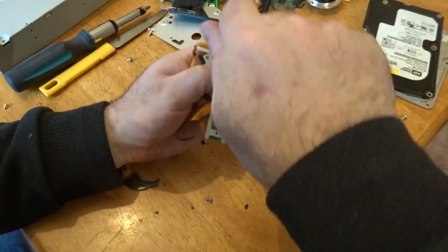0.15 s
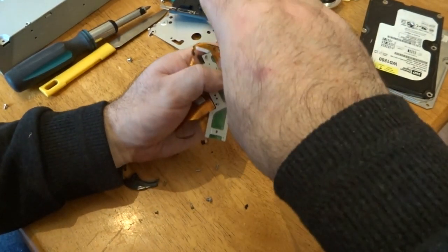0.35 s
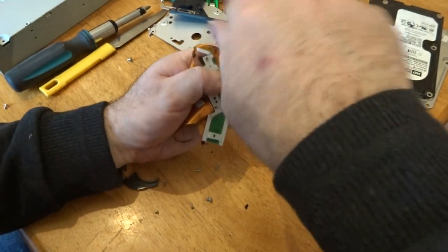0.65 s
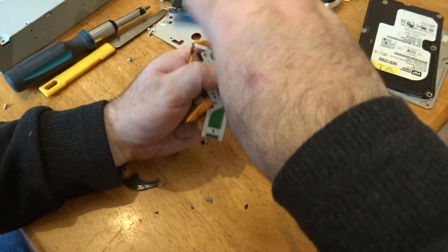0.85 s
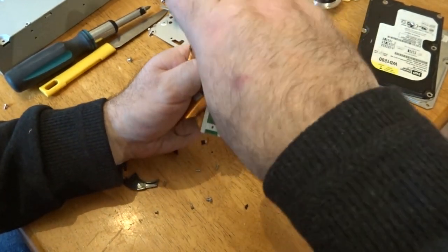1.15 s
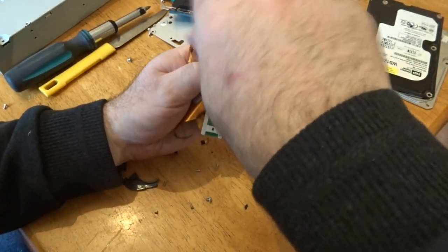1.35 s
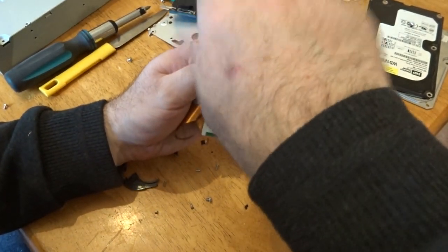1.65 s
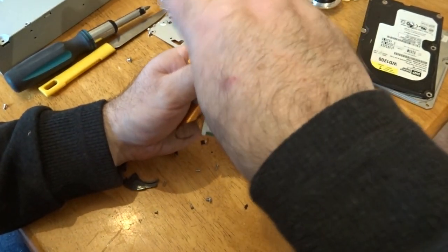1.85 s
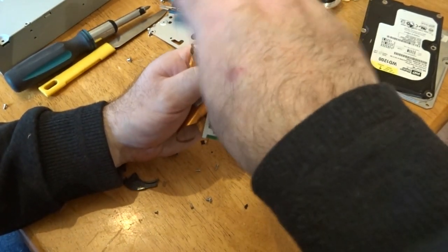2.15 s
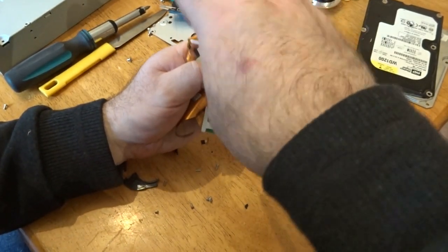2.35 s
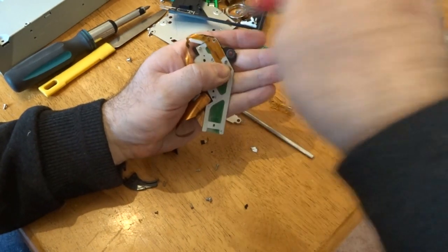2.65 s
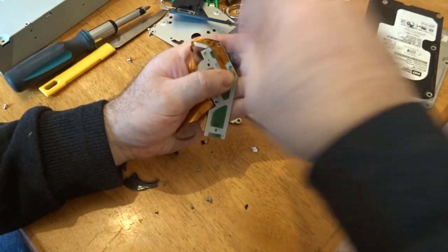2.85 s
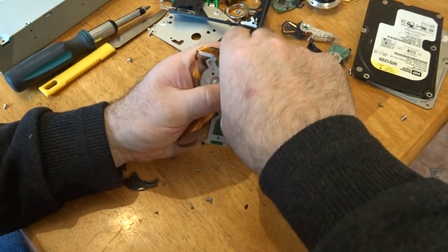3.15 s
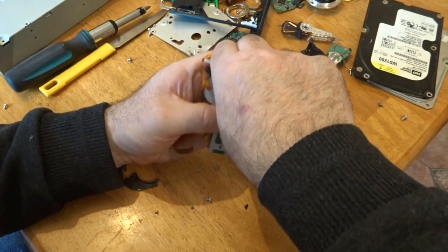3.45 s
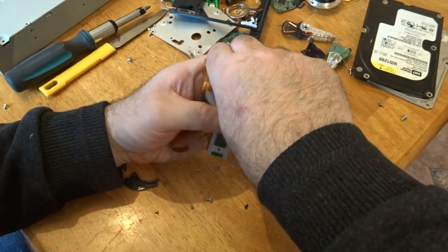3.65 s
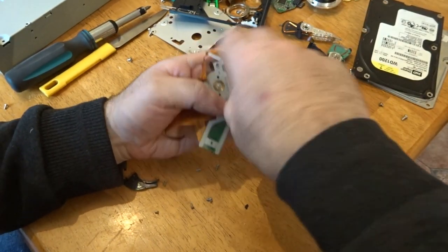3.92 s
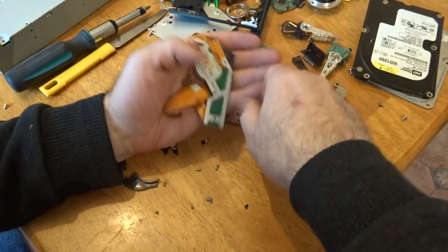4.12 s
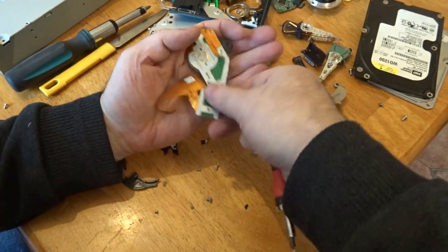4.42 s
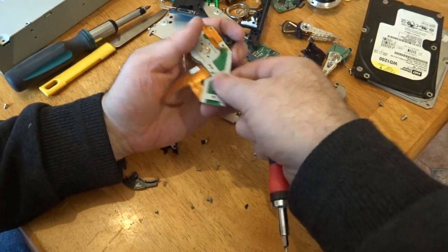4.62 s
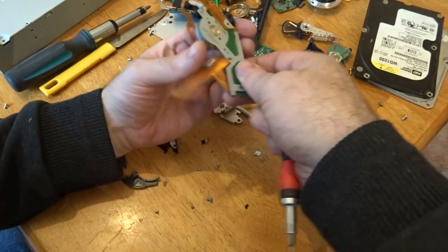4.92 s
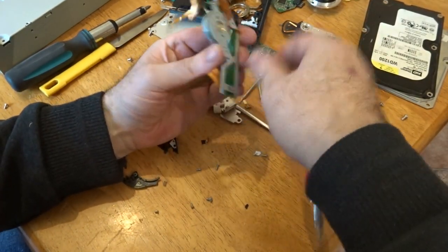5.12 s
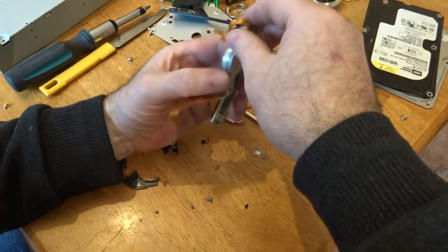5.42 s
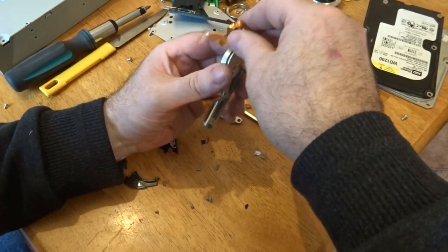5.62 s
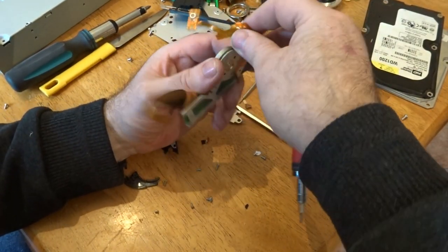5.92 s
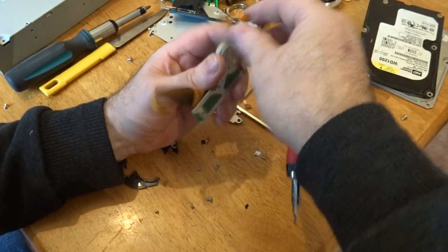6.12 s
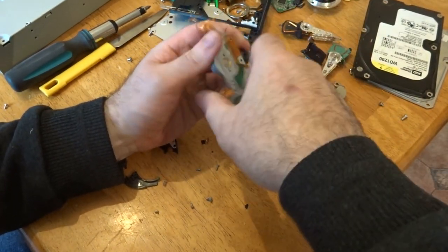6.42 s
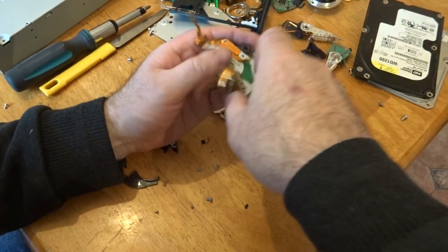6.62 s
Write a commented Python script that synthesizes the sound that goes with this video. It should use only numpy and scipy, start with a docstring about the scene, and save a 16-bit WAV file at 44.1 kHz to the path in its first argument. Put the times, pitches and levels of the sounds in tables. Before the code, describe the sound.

Tiny brittle clicks and snaps, mostly a millisecond or two long, come in uneven clusters as a small part is worked by hand. Soft gritty finger rubbing lies between them. Early clicks are mid-high and plasticky; later ones are thinner and more metallic. Two dull wooden bumps, a barely audible squeak or two and low, airy room noise sit beneath, heard close up in a small room.

```python
"""Prying small parts apart

Hands pry small plastic and metal parts apart over a wooden bench in a small room, heard close up in stereo.
Each snap is a burst of a millisecond or two that rings the part; fingers rustle as tiny slips over hiss.
Decaying low tones make two bench bumps, gliding tones squeak faintly, and echoes with a dense tail make the room.
Coloured noise gives the quiet wide air, the shaking bench and a hollow swell; a thin wavering tone whines."""
import sys
import numpy as np
from scipy import signal
from scipy.fft import rfft, irfft
from scipy.io import wavfile
from scipy.ndimage import uniform_filter1d

SR = 44100
rng = np.random.default_rng(int(sys.argv[2]) if len(sys.argv) > 2 else 0)


def store_wav(level_fs):
    """Save 16-bit WAV to argv[1]."""
    pcm = np.round(np.clip(np.atleast_2d(level_fs), -1, 1) * 32767)
    wavfile.write(sys.argv[1], SR, pcm.T.astype(np.int16))


N = 298557  # length in samples

# parts snapping: [start t/s, energy level/dB, ring f/Hz, brightness/dB, weight/dB, thud/dB]
SNAP_EVENTS = [(0.0137, -22.0, 3950, -16, 6, 11), (0.1059, -18.5, 4200, -13, 5, -8),
               (0.1114, -17, 4200, -11, 0, -8), (0.334, -13.4, 3940, -22, -6, -8),
               (0.3622, -3, 3950, -14, -5.5, -6.5), (0.4854, -25.5, 3940, -6, -18, -12),
               (0.543, -16.5, 4130, -19, -4, -2), (0.6658, -12.5, 4100, -17, -6, -4),
               (0.7071, -22, 4500, -22, 4, -9), (0.858, -13.5, 8000, -5, 1.5, -2),
               (0.9662, -19, 3970, -8, 0, -12), (1.045, -19.1, 9050, -7, -21, -15),
               (1.0865, -22.5, 4200, -26, 2, 3), (1.125, -19.5, 3910, -5, -2, -13),
               (1.2157, -5.5, 9140, 3.5, -16, -9), (1.4081, -22.5, 8950, -6, -15, -11),
               (1.441, -21.5, 8850, -5, -13, -20), (1.6872, -11.5, 4520, -8, -12, -17),
               (1.7208, -15, 10700, -3, -9, -19), (1.9756, -22, 13500, 26, -11, -3),
               (2.024, -18.5, 12400, -8, -6, -7), (2.1335, -17.5, 7060, -13, -4, -9),
               (2.139, -6, 4000, -16, 0, -14.5), (2.1535, -14, 4160, -8, -7, -14),
               (2.2841, -7, 4020, -9, -6, -15), (2.314, -18.5, 3920, -14, 4, -9),
               (2.3458, -14, 5970, -17, -1, -17), (2.4053, -9.0, 3240, -15.5, -0.5, -8),
               (2.519, -10.5, 3880, -16, -9, -22), (2.5381, -5.5, 3720, -17, 0, -23),
               (2.5556, -12, 3800, -11, 4, -7), (2.602, -21, 4100, 1, 2, -11),
               (2.6478, -13.6, 5320, -14, -8, -12), (2.6693, -18, 5500, -5, 1, -9),
               (2.7109, -4, 6500, -4, 2.5, -11.5), (2.7706, -19.5, 4500, -15, -1, -13),
               (2.8604, 5.5, 4130, -6.5, -1.5, -21), (2.8872, -3, 7050, 7, -4, -18),
               (2.9475, -19, 2770, -12, 7, -8), (3.125, -28.5, 5070, -21, 4, 1),
               (3.4, -19, 3180, -6, -6, -18), (3.5512, -20, 7300, 0, -13, -2),
               (3.6931, -15, 7000, -4, -2, -9), (3.7344, -28, 2780, -14, 17, 6),
               (3.751, -20.5, 2800, 1, -1, -20), (4.2021, -10, 6400, 0, -1, -6),
               (4.327, -19, 6150, 0, 1, 1), (4.624, -26.2, 6450, -3, -8, -12),
               (4.678, -20.5, 6470, -1, -9, -10), (4.7397, -17.5, 5500, 1, -15, -21),
               (4.8224, -9, 10200, -1, -11, -4), (4.8367, -15, 4280, -13, -6, -10),
               (4.868, -8, 7160, 3, -18, -26), (4.8762, -15, 9300, 0, -19, 3),
               (4.887, -21, 3960, -2, -4, -2), (4.92, -19, 3930, -21, 3, 7),
               (5.0968, -3.9, 12100, -9, -16, -6), (5.4417, -24, 9600, 4, -8, -3),
               (5.501, 0.8, 6960, 9, -6.5, -17), (5.5248, -4.0, 6940, 1, -11, -11),
               (5.697, -3.5, 11700, 25, -29, -23), (5.7437, -20.5, 14800, 17, -21, -15),
               (5.881, -16.7, 6360, 12, -13, -8), (5.981, 4.5, 11800, 15, -20, -13),
               (6.089, -16.5, 6400, -3, -12, -13), (6.115, -10.0, 6100, 5, -2, -11),
               (6.1516, -12.6, 8500, 12, -3, -11), (6.163, -19, 11750, 17, -15, 3),
               (6.2854, -20, 3920, -20, 1, 0), (6.379, -15, 2680, -11, 5, 4),
               (6.3898, -5.5, 4700, -9, -4, -9), (6.4033, -2.5, 2530, -20, 11.5, -3),
               (6.4284, -14, 4070, 5, -9, -7), (6.5816, -18, 2700, -3, 7, -5),
               (6.5947, -20.5, 8870, 0, -1, -11), (6.6828, -14, 9100, 18, -8, -15),
               (6.7275, 1.6, 10500, 10, 2, -24)]
# colour of a snap: [f/Hz, level/dB, then dB per dB of brightness, of weight, of thud]
SNAP_TINT = [(300, -15, -0.5, 0.17, 0.8), (1540, -3.5, 0, 0, 1), (2770, 0, 0, 0.85, 0),
             (4000, -1, -0.37, 0.013, 0), (7300, 2.5, 0, 0.0091, 0.086), (11900, 0.5, .5, 0.02, 0.072),
             (17000, -5, .5, 0, 0.15)]
# where the held part rings: [f/Hz, width f/Hz, lift level/dB]
PART_RINGS = [(4000, 900, 4), (6550, 500, 3), (9200, 2100, 2), (12000, 1200, 2)]
# fingers rubbing and flexing the parts: [start t/s, end t/s, level/dB, brightness/dB, weight/dB]
RUB_STROKES = [(0, 0.103, -60.5, -22, 7), (0.252, 0.33, -64, -12, -0.5), (0.364, 0.526, -56.5, -6, -4),
               (0.83, 1.23, -62.5, 2, -5), (1.627, 1.792, -61, 24, -6), (1.96, 2.124, -60, -12, 1),
               (2.104, 2.17, -56, 3, 0), (2.283, 2.444, -51.5, 6, -10), (2.506, 2.622, -54.5, 4, 3),
               (2.755, 2.88, -50, 0, -6), (3.299, 3.435, -62, -3, -19), (3.536, 3.586, -61, -14, -8),
               (3.675, 3.776, -55, 7, 1), (3.81, 3.93, -62.5, 1, -5), (4.192, 4.309, -50, -1.5, 11),
               (4.293, 4.533, -52, -2, 6), (4.538, 4.748, -53.5, 3, 2), (4.787, 4.865, -43, -4, 11),
               (4.855, 4.948, -49.5, -5, 13.5), (5.067, 5.09, -52, 7, 19.5), (5.376, 5.478, -65.5, 8, 2),
               (5.982, 6.2, -52.5, -1, 5.5), (6.324, 6.419, -54.5, -2, 5.5), (6.41, 6.532, -53, -2, 5),
               (6.546, 6.663, -58.5, 2, -11), (6.687, 6.702, -64, -12, -1)]
# colour of a rub: [f/Hz, level/dB, then dB per dB of brightness, of weight]
RUB_TINT = [(1180, -8.5, 1, 0.62), (2000, -2.5, 0.5, 1), (2870, -5, -.3, 0.24), (4000, -0.5, -.5, 0),
            (7000, 2.5, 1, 0.12), (12100, 0, 1, 0.043), (16900, -4, -0.5, 0)]
# bumps on the bench: [start t/s, level/dB, extra level of the tones above 200 Hz/dB]
BENCH_BUMPS = [(2.188, -33.5, -2.5), (6.596, -25, 7.5)]
# tones of the bench: [f/Hz, level/dB, time to fall by 60 dB t/s]
BENCH_MODES = [(44.7, -8, 0.54), (94.2, 0, 0.22), (120, -4.5, 0.3), (331.5, 4.5, 0.072), (398, -17, 0.33),
               (530, -5, 0.037)]
# the bench and microphone mount shaking faintly: [t/s, level/dB]
SHAKE_LEVEL = [(0, -72.5), (.35, -69), (.42, -58.5), (.65, -69), (.95, -69.5), (1.1, -67), (1.4, -76),
               (2.17, -67), (2.22, -53), (2.5, -58.5), (2.75, -72), (3.2, -72), (4.8, -79.5), (6.59, -79),
               (6.65, -51), (6.77, -68)]
# colour of the shaking: [f/Hz, relative level/dB]
SHAKE_SPECTRUM = [(15, -42), (45, -13.5), (120, -7.5), (220, -17), (400, -35)]
# swells of a hollow band of noise, about one a second: [loudest t/s, level/dB, fade t/s]
SWELL_EVENTS = [(.53, -56, 0.17), (1.5, -67, 0.38), (2.569, -59.5, 0.18), (3.35, -65.5, 0.6),
                (4.29, -59.5, 0.21), (5.15, -58, 0.35), (6.08, -59, 0.38)]
# the hollow resonance of the swells: [f/Hz, width f/Hz]
SWELL_RESONANCE = (358, 122)
# colour of the room air: [f/Hz, relative level/dB]
AIR_SPECTRUM = [(18, -21), (30, -16), (134, 3), (251, 4), (301, 3.5), (537, 2.5), (931, 2), (1240, -9),
                (1420, 1.5), (1940, 5), (2590, -6.5), (7010, -10), (12200, -11.5), (14600, -12.5),
                (15800, -20)]
# how alike left and right air are: [f/Hz, likeness from -1 to 1]
AIR_LIKENESS = [(60, 0.057), (130, 0.48), (290, -0.49), (640, -0.53), (1410, 0.14), (3100, -0.07),
                (6820, 0.63), (15000, 1)]
# how much louder the air is on the left: [f/Hz, level/dB]
AIR_LEFT_LIFT = [(60, 2), (180, -1.5), (550, 3), (1650, -7), (4970, 1.5), (15000, -1)]
# how fast the room's tail dies: [f/Hz, time to fall by 60 dB t/s]
ROOM_DECAY = [(1000, 1), (2600, 0.44), (7000, 0.38), (15500, 0.23)]
# early echoes from bench and walls: [delay t/s, level/dB]
EARLY_ECHOES = [(.0035, -13.5), (.0085, -12), (0.0116, -19.5), (0.016, -18), (.026, -21)]
# faint short tones: [start t/s, length t/s, start f/Hz, end f/Hz, level/dB]
SQUEAK_GLIDES = [(2.036, 0.07, 902, 954, -61), (5.218, 0.06, 675, 636, -59)]
# the microphone's treble fall: [f/Hz, level/dB]
MIC_TREBLE = [(15750, 0), (16000, -30), (16900, -38)]

AIR_DB, WHINE_DB, WHINE_HZ = -55.5, -74, 15625
SWELL_RISE_S, SWELL_REST_DB = 0.1, -74
SNAP_PAN_DB = 0.3  # left over right
EDGE_HZ = 17050  # top of the microphone's band


def gain_of(db):
    """Turns dB into a multiplying factor."""
    return 10 ** (np.asarray(db) / 20)


def left_right(pan_db):
    """Two gains that make left louder than right by pan_db."""
    return gain_of([[pan_db / 2], [-pan_db / 2]])


def evened(x):
    """Scales a sound so that its average strength (rms) is 1."""
    return x / np.sqrt(np.mean(x ** 2) + 1e-20)


def read(points, hz):
    """Reads a table between its points, with pitch spaced as the ear hears it (log frequency)."""
    f, value = np.transpose(points)
    return np.interp(np.log(hz + 1), np.log(f + 1), value)


def coloured(x, points):
    """Makes each frequency louder or softer by a table in dB."""
    n = x.shape[-1]
    return irfft(rfft(x) * gain_of(read(points, np.fft.rfftfreq(n, 1 / SR))), n)


def tinted(colour, *amounts_db):
    """Shifts a colour by one event's brightness, weight and, for snaps, thud."""
    return [(hz, db + np.dot(shares, amounts_db)) for hz, db, *shares in colour]


def part_rings(hz):
    """The dB by which the held part's resonances lift each frequency."""
    return sum(db / (1 + ((hz - f) / width * 2) ** 2) for f, width, db in PART_RINGS)


def pair(same):
    """Two channels of noise with the given likeness."""
    a, b = rng.standard_normal((2, N))
    return np.array([a, same * a + np.sqrt(1 - same ** 2) * b])


def add(mix, s, sound):
    """Mixes a sound in at s seconds, cut off where the mix ends."""
    part = mix[:, round(s * SR):][:, :sound.shape[1]]
    part += sound[:, :part.shape[1]]


def air(patchy_db=1.5):
    """Air noise built from random short-time spectra with drifting patches, plus a thin wavering whine."""
    frames, hz = N // 256 + 5, np.fft.rfftfreq(1024, 1 / SR)
    a, b, c, d, patches = rng.standard_normal((frames, 513, 5)).T
    patches = uniform_filter1d(patches, size=12, axis=0)  # smooth over pitch
    patches = evened(uniform_filter1d(patches, size=20, axis=1))  # smooth over time
    same = read(AIR_LIKENESS, hz)[:, None]
    left = a + 1j * b
    right = same * left + np.sqrt(1 - same ** 2) * (c + 1j * d)
    balance_db = np.outer([.5, -.5], read(AIR_LEFT_LIFT, hz))[:, :, None]
    spectra = np.array([left, right])
    spectra *= gain_of(read(AIR_SPECTRUM, hz)[:, None] + patchy_db * patches + balance_db)
    noise = evened(signal.istft(spectra, nperseg=1024, noverlap=768)[1][:, :N])
    waver = 1 + 0.26 * evened(uniform_filter1d(rng.standard_normal(N), 3000))
    tone = np.sqrt(2) * np.sin(2 * np.pi * WHINE_HZ * np.arange(N) / SR)
    return gain_of(AIR_DB) * noise + gain_of(WHINE_DB) * waver * tone


def shake(same=0.9, pan_db=4):
    """Lumpy low noise carried through the bench."""
    s, db = np.transpose(SHAKE_LEVEL)
    level = gain_of(np.interp(np.arange(N) / SR, s, db))
    return level * left_right(pan_db) * evened(coloured(pair(same), SHAKE_SPECTRUM))


def swell(same=0.3):
    """Noise through one broad resonance, applied twice; each swell rises quickly and fades at its own pace."""
    f, width = SWELL_RESONANCE
    hz, t = np.fft.rfftfreq(N, 1 / SR), np.arange(N) / SR
    level = gain_of(SWELL_REST_DB)
    for s, db, fade_s in SWELL_EVENTS:
        pace = np.where(t < s, SWELL_RISE_S, fade_s)
        level = level + gain_of(db) * np.exp(-((t - s) / pace) ** 2)
    hollow = irfft(rfft(pair(same)) / (1 + ((hz - f) / width * 2) ** 2), N)
    return level * evened(hollow)


def rub(grains_per_s=3500, spread_db=4.5, hiss=0.86, clump_db=3.0, patchy_db=4, edge=0.3):
    """Tiny slips in clumps over skin hiss, ringing the part in shifting patches, coloured stroke by stroke."""
    clumps = gain_of(clump_db * evened(uniform_filter1d(rng.standard_normal(N), size=400)))
    strength = gain_of(spread_db * np.minimum(rng.exponential(1, N), 4))
    slips = strength * (rng.random(N) < grains_per_s / SR)
    fading = signal.lfilter([1], [1, -.93], slips)  # each slip dies within about two milliseconds
    grains = evened(rng.standard_normal(N) * fading)
    rustle = clumps * (grains + hiss * rng.standard_normal(N))
    hz, _, z = signal.stft(rustle, SR, nperseg=128)
    patches = uniform_filter1d(rng.standard_normal(z.shape), size=5, axis=1)  # smooth over time
    patches = evened(uniform_filter1d(patches, size=4, axis=0))  # smooth over pitch
    z = z * gain_of(part_rings(hz)[:, None] + patchy_db * patches)
    rustle = signal.istft(z, SR, nperseg=128)[1]
    out = np.zeros((2, N))
    for start, end, db, bright_db, weight_db in RUB_STROKES:
        part = rustle[round(start * SR):round(end * SR)]
        stroke = evened(coloured(part, tinted(RUB_TINT, bright_db, weight_db)))
        stroke *= signal.windows.tukey(len(part), edge)  # soft start and end
        add(out, start, gain_of(db) * stroke[None])
    return out


def snaps(fall_s=0.001054, quicker_per_db=.02, rise=0.43, crack=0.15, crack_s=0.000071,
          creak=0.067, creak_s=0.0011, flatten=0.24, ring_db=1, ring_share=0.033, part_share=.8):
    """A short tinted noise burst per snap, quicker when bright; it rings the part and one spot of its own."""
    lead_s = .008  # room for the creak ahead of the snap
    t, hz, out = np.arange(1024) / SR - lead_s, np.fft.rfftfreq(1024, 1 / SR), np.zeros((2, N))
    for s, db, ring_hz, *tint_db in SNAP_EVENTS:
        fall = fall_s * np.exp(-quicker_per_db * tint_db[0])
        u = np.maximum(t, 0) / fall
        shape = (1 - np.exp(-u / rise)) ** 2 * np.exp(-u)
        shape += creak * np.exp(-abs(t) / creak_s)  # it creaks before it gives
        shape += crack * np.exp(-abs(t - fall) / crack_s)  # the instant of release
        burst = rfft(rng.standard_normal(1024) * shape)
        # partly flatten the noise burst's own spectrum, so that the snap's tint shows
        burst /= uniform_filter1d(abs(burst) ** 2, size=9) ** flatten
        colour = read(tinted(SNAP_TINT, *tint_db), hz) + part_share * part_rings(hz)
        # a narrow resonance rings on after the burst
        peak = 1 + gain_of(ring_db) / (1 + 1j * (hz - ring_hz) / (ring_share * ring_hz))
        snap = irfft(burst * gain_of(colour) * peak)
        add(out, s - lead_s, gain_of(db) * left_right(SNAP_PAN_DB) * snap / np.linalg.norm(snap))
    return out


def room(x, scatter_s=.0003, wet_db=-7.5, same=0.88, start_s=0.0011):
    """A few early echoes, with a dense tail in which each band dies at its own speed."""
    n = SR // 2
    fade_in = np.clip((np.arange(n) / SR - start_s) / 0.012, 0, 1)
    hz, t, z = signal.stft(pair(same)[:, :n] * fade_in, SR, nperseg=256)
    decay = gain_of(-60 * t / read(ROOM_DECAY, hz)[:, None])
    tail = signal.istft(z * decay, SR, nperseg=256)[1]
    tail *= gain_of(wet_db) / np.linalg.norm(tail, axis=1, keepdims=True)
    for s, db in EARLY_ECHOES:
        scatter = pair(same)[:, :40] * np.exp(-np.arange(40) / (scatter_s * SR))  # uneven surfaces smear it
        add(tail, s, gain_of(db) * scatter / np.linalg.norm(scatter[0]))
    return signal.fftconvolve(x, tail, axes=1)[:, :N]


def squeaks():
    """Short soft tones that glide a little in pitch."""
    out = np.zeros((2, N))
    for s, length, from_hz, to_hz, db in SQUEAK_GLIDES:
        hz = np.linspace(from_hz, to_hz, round(length * SR))
        tone = np.sin(2 * np.pi * np.cumsum(hz) / SR)
        add(out, s, gain_of(db) * np.hanning(len(hz)) * tone[None])
    return out


def bumps(pan_db=4, wobble=0.72, rise_s=0.0047):
    """Each bump rings the low modes of the bench, unevenly, stronger on the left."""
    t, out = np.arange(SR // 2) / SR, np.zeros((2, N))
    for s, db, knock_db in BENCH_BUMPS:
        rattle = 1 + wobble * evened(uniform_filter1d(rng.standard_normal((2, len(t))), 900))
        ring = np.zeros(len(t))
        for f, mode_db, t60 in BENCH_MODES:
            fading = gain_of(mode_db + knock_db * (f > 200) - 60 * t / t60)
            ring += fading * np.sin(2 * np.pi * f * t)
        onset = 1 - np.exp(-t / rise_s)
        add(out, s, gain_of(db) * left_right(pan_db) * rattle * onset * ring / abs(ring).max())
    return out


def scene():
    """Hands and parts echoing in the room, over squeaks, bench, swell and air."""
    background = air() + shake() + swell()
    hands = rub() + snaps()
    return background + hands + room(hands) + squeaks() + bumps()


def record(dry):
    """The microphone's treble fall, then a steep cut at the top of its band."""
    band = signal.firwin(511, EDGE_HZ, window=("kaiser", 9), fs=SR)
    return signal.oaconvolve(coloured(dry, MIC_TREBLE), band[None], "same")


dry = scene()
out = record(dry)
store_wav(out)
```